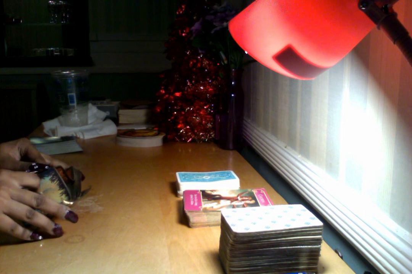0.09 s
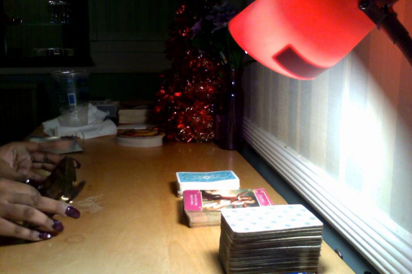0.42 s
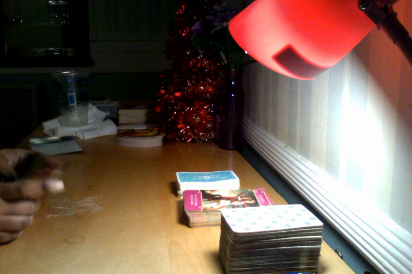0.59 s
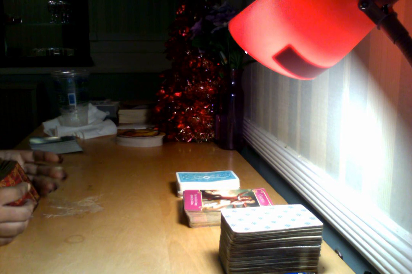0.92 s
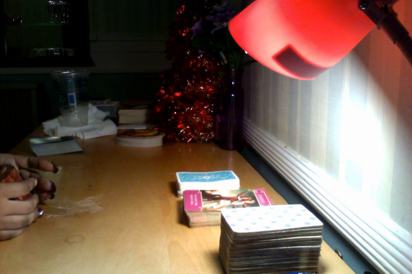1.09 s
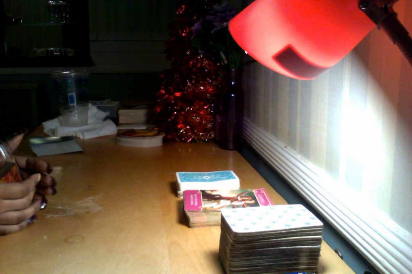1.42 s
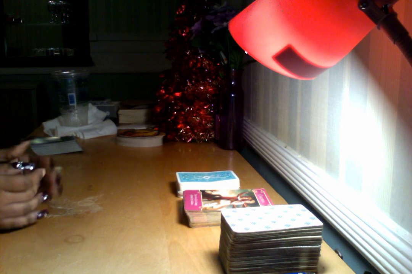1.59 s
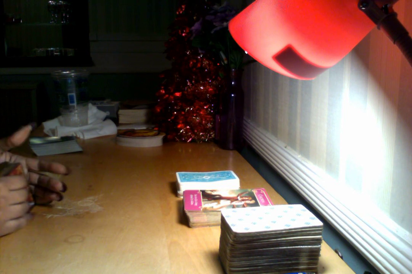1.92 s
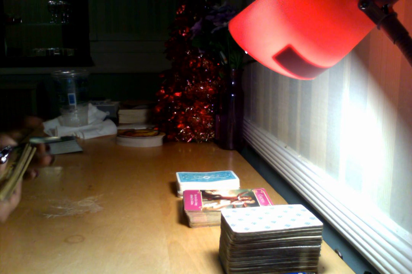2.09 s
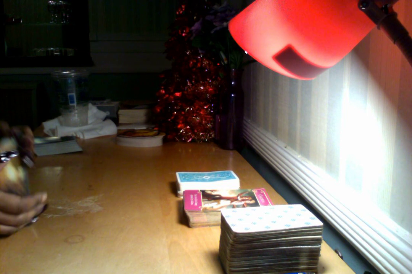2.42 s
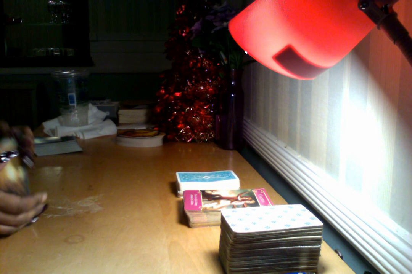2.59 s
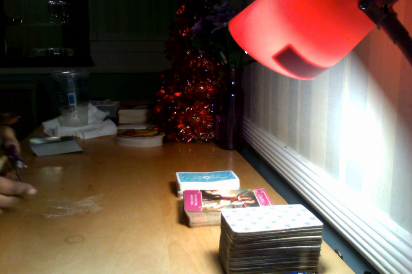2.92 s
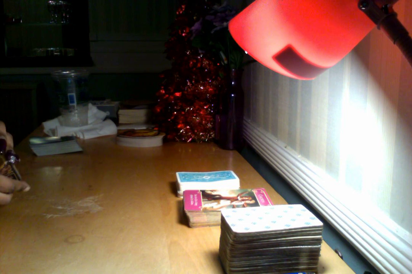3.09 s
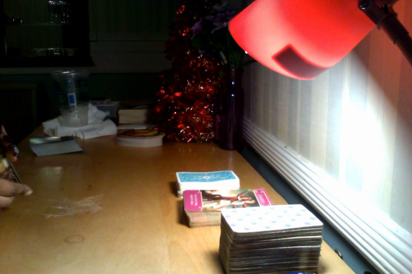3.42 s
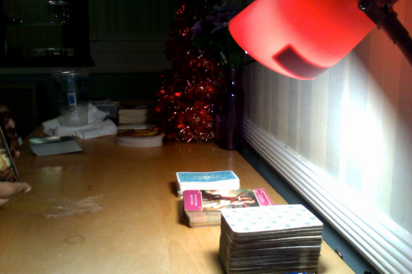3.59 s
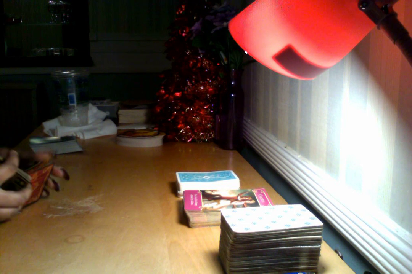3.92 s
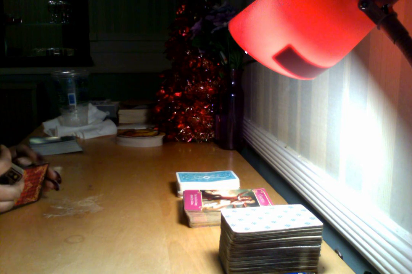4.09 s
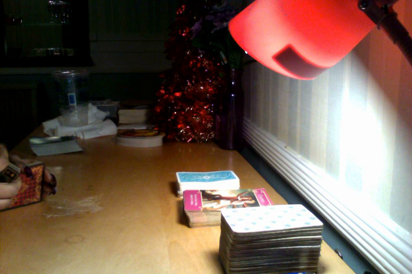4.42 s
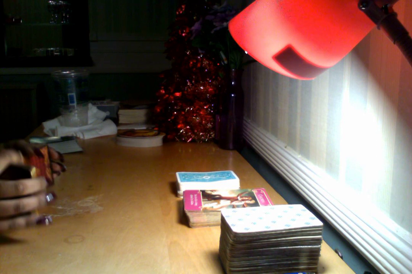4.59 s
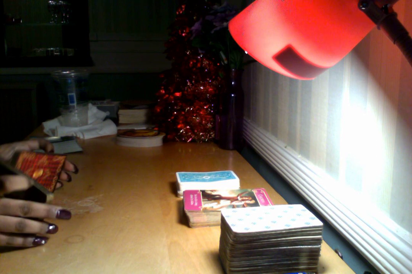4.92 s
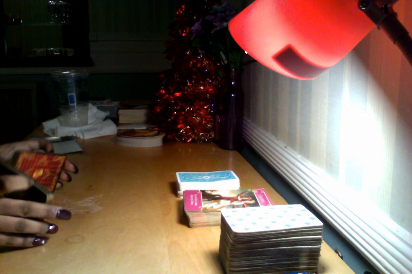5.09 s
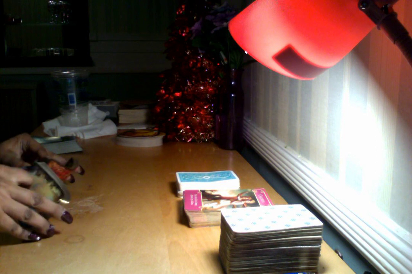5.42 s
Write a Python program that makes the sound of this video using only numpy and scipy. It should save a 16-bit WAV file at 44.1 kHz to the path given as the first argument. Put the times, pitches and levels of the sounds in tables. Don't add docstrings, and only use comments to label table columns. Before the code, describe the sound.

Close-up hands riffle and square playing cards on a wooden table, with sparse snaps, slaps, one heavy blow and quiet rustling in a lively room.

```python
import sys
import numpy as np
from scipy import signal
from scipy.fft import rfft, irfft
from scipy.io import wavfile
from scipy.ndimage import uniform_filter1d

SR = 44100
rng = np.random.default_rng(int(sys.argv[2]) if len(sys.argv) > 2 else 0)


def generate_wav(sig):
    pcm = np.round(np.clip(np.atleast_2d(sig).T, -1, 1) * 32767).astype(np.int16)
    wavfile.write(sys.argv[1], SR, pcm)


def elevation(decibels):
    levels = np.asarray(decibels, float)
    return 10 ** (levels / 20)


N = 243431


def evened(x):
    return x / np.sqrt(np.mean(x ** 2) + 1e-30)


def read(points, hz):
    f, value = np.transpose(points)
    return np.interp(np.log(hz + 1), np.log(f + 1), value)


def add(mix, s, sound):
    part = mix[max(round(s * SR), 0):][:len(sound)]
    part += sound[:len(part)]


def colour(x, points):
    hz = abs(np.fft.fftfreq(2048, 1 / SR))
    log_gain = np.log(elevation(np.maximum(read(points, hz), -90)))
    taps = np.fft.ifft(np.exp(np.conj(signal.hilbert(log_gain)))).real[:1024]
    return signal.oaconvolve(x, taps / np.linalg.norm(taps))


def band(x, low_hz, high_hz):
    sos = signal.butter(3, [low_hz, min(high_hz, 16000)], "bandpass", fs=SR, output="sos")
    return signal.sosfilt(sos, x)


def resonate(x, hz, width_hz):
    r = np.exp(-np.pi * width_hz / SR)
    return 2 * signal.lfilter([1 - r], [1, -r * np.exp(2j * np.pi * hz / SR)], x).real


def burst(length_s, rise_s, rough_db, grain):
    t = np.arange(0, length_s, 1 / SR)
    noise, lumps = rng.standard_normal((2, SR // 2))
    grainy = noise * elevation(rough_db * evened(uniform_filter1d(lumps, size=grain)))
    shape = np.minimum(t / rise_s, 1) * np.minimum((length_s - t) / (.3 * length_s), 1)
    return grainy[:len(t)] * shape


# f/Hz, t60/s
ROOM_DECAY = [(120, 0.56), (330, 0.44), (870, 0.48), (1700, 0.48), (3500, 0.49), (5000, 0.45), (7000, 0.34),
              (10000, 0.26), (13000, 0.18)]


def room(x, onset_s=0.0009):
    evenness = .7
    hz, t, z = signal.stft(rng.standard_normal(SR), SR, nperseg=256)
    z = z / (abs(z) + 1e-9) ** evenness
    t60 = np.clip(read(ROOM_DECAY, hz), .05, 2)[:, None]
    tail = signal.istft(z * elevation(-60 * t / t60), SR, nperseg=256)[1]
    tail *= 1 - np.exp(-np.arange(len(tail)) / SR / onset_s)
    return signal.fftconvolve(x, tail / np.linalg.norm(tail))[:N]


# t/s, peak level/dB, pitch f/Hz, treble level/dB
RIFFLE = [(0.0034, -19.5, 1600, -8), (0.0955, -22.5, 1670, -10), (0.1033, -14, 1830, -16.5),
          (0.1155, -10.5, 1260, -12.5), (0.124, -15.5, 2170, -13), (0.203, -34, 1410, -4.5),
          (0.2102, -5.5, 1940, -12), (0.217, -13, 3200, -8.5), (0.228, -13, 1485, -24.5),
          (0.234, -19, 3077, -11.5), (0.2796, -29, 1518, -17), (0.2915, -17.5, 1290, -16),
          (0.2996, -14.5, 3120, -14), (0.3069, -23.5, 1397, -21), (0.3149, -14.5, 1420, -13.5),
          (0.3205, -0.5, 1570, -14.5), (0.3276, -11, 2170, -2), (0.343, -22.5, 2635, -10.5),
          (0.3618, -12.5, 1400, -6.5), (0.3724, -16, 1850, -2.5), (0.394, -15.5, 1170, -11),
          (0.402, -20.5, 1680, -9.5), (0.4317, -8, 1790, -36)]
# t/s, peak level/dB, pitch f/Hz, treble level/dB, treble f/Hz
CATCHES = [(0.6897, -38, 1280, -11, 5300), (0.8129, -38.5, 1224, -26, 5570),
           (1.3105, -51.5, 5000, -21, 5050), (1.3541, -49, 1820, -24, 7140), (1.592, -42, 2200, -13, 7000),
           (1.601, -39, 2200, -5, 7000), (1.7711, -30, 1178, -27, 4500), (1.8907, -28, 1070, -23, 5200),
           (1.9388, -22, 2600, -21, 5500), (1.9475, -27.5, 2500, -6.5, 5600), (1.9701, -40, 2530, 2, 6350),
           (2.3582, -54, 1060, -13, 5000), (2.4915, -37, 1078, -38, 5016), (3.79, -33, 2095, -29, 9000),
           (3.8082, -30, 2600, -14, 8500), (3.8169, -30.5, 1347, -7.5, 8700),
           (3.92, -27.5, 1160, -26, 6200), (4.0269, -40.5, 2590, -24, 5020),
           (4.1285, -44.5, 1300, -30, 5000), (4.334, -50, 1472, -26, 5406),
           (4.9652, -37.5, 1168, -27.5, 5010), (5.0294, -47.5, 988, -25.5, 5100),
           (5.123, -59.5, 4100, -15.5, 5100)]
# ring t60/s, share of broad fizz [ratio], fizz spread [ratio]
RIFFLE_EDGE = (0.016, .45, 1.9)
CATCH_EDGE = (.018, 0.15, 1.3)


def snaps():
    out, t = np.zeros(N), np.arange(2500) / SR
    riffle = [row + (6830,) for row in RIFFLE]
    for rows, (t60, broad, spread) in (riffle, RIFFLE_EDGE), (CATCHES, CATCH_EDGE):
        fade = elevation(-60 * t / t60) * (1 - np.exp(-t / .0005)) ** 2
        for s, db, hz, treble_db, treble_hz in rows:
            low, high = rng.standard_normal((2, len(t)))
            width_hz = 0.79 * hz
            rough = evened(resonate(resonate(low, hz, width_hz), hz, width_hz))
            body = 0.46 * np.sin(2 * np.pi * hz * t) + .5 * rough
            narrow_fizz = band(high, treble_hz / spread, treble_hz * spread)
            fizz = evened(narrow_fizz + broad * band(high, 3000, 13000))
            add(out, s - .001, elevation(db) * fade * (body + elevation(treble_db) * fizz))
    return out + elevation(-10) * room(out)


# f/Hz, width/Hz, level/dB
TABLE = [(207.8, 6.7, -8.5), (361, 30, -13.5), (510, 18, 6.5), (674, 12, -10.5), (772, 42, 2.5)]


def slap(contact_s, top_hz, wood_db, chatter_db, points):
    chatter_gap_s, chatter_t60_s = .009, 0.0093
    blow = np.pad(burst(contact_s, .0015, 2.5, grain=60), (0, SR // 4))
    body = band(colour(blow, points)[:len(blow)], 100, top_hz)
    body = band(band(body, 49, 0.98 * top_hz), 40, 1.15 * top_hz)
    knock = band(blow, 100, 830)
    wood = sum(elevation(db) * resonate(knock, hz, width) for hz, width, db in TABLE)
    since_click = np.arange(len(blow)) / SR % chatter_gap_s
    edges = blow * elevation(-60 * since_click / chatter_t60_s)
    chatter = band(band(edges, 10100, 11300), 10100, 11300)
    return body + elevation(wood_db + 11.5) * wood + elevation(chatter_db + 13) * chatter


# t/s, level/dB, contact t/s, top f/Hz, chatter level/dB
SLAPS = [(1.395, -32, 0.016, 3470, -60), (1.412, -35.5, 0.039, 5120, -50.5),
         (1.427, -27.5, 0.025, 6950, -30), (1.447, -24, 0.019, 6970, -14), (1.496, -30.5, 0.012, 7000, -48),
         (1.59, -39, 0.038, 7400, -35), (1.70, -46, 0.059, 2250, -33), (4.602, -24.5, 0.023, 4870, -26.5),
         (4.627, -22, 0.018, 8060, -25.5), (4.667, -23, 0.029, 8000, -17.5), (4.688, -21, 0.005, 8860, -46)]
SLAMS = [
    (2.561, -8, .016, 11050, -45.5),
]
# f/Hz, level per Hz/dB
SLAP_COLOUR = [(88, -32), (150, -15), (427, -14), (495, -8.5), (935, -8.5), (1380, -6), (1490, -13),
               (1940, -8.5), (2760, -11), (4570, -15.5), (10600, -33.5), (13000, -72)]
SLAM_COLOUR = [(88, -41), (150, -14.5), (207, -3.5), (290, -15), (390, -5.5), (782, -18), (1150, -10),
               (1380, -14.5), (1550, -5), (2350, -17), (3100, -12), (4000, -15), (4700, -20), (7070, -22.5),
               (14000, -64.5)]


def slaps():
    out = np.zeros(N)
    for rows, points, wood_db in (SLAPS, SLAP_COLOUR, -4.5), (SLAMS, SLAM_COLOUR, -6.5):
        for s, db, contact_s, top_hz, chatter_db in rows:
            add(out, s, elevation(db) * slap(contact_s, top_hz, wood_db, chatter_db, points))
    return out + elevation(-1.5) * room(out)


# t/s, peak level/dB, ring t60/s, second mode level/dB
THUMPS = [(0.009, -37.5, 0.08, -5.5), (0.11, -54, 0.059, -27), (0.238, -36, 0.11, -20),
          (0.352, -35.5, 0.16, -6.5), (0.456, -37, 0.11, -31), (1.466, -30.5, 0.1, -21),
          (1.605, -35, 0.1, -8), (1.732, -33.5, 0.071, -5.5), (1.919, -57, 0.09, -15),
          (2.467, -38, 0.096, -10.5), (2.579, -10, 0.07, -11.5), (3.938, -36, 0.074, -12.5),
          (4.038, -49, 0.094, -18), (4.089, -52.5, 0.14, -16), (4.149, -49, 0.071, -12),
          (4.632, -23.5, 0.14, -28), (4.688, -23, 0.095, -11)]
LOWEST_MODE_HZ = 121.8


def thumps():
    out, t = np.zeros(N), np.arange(SR // 2) / SR
    for s, db, t60, upper_db in THUMPS:
        swell = (1 - np.exp(-t / 0.021)) ** 2 * elevation(-60 * t / max(t60, .03))
        ring = np.sin(2 * np.pi * LOWEST_MODE_HZ * t)
        ring += elevation(upper_db) * np.sin(2 * np.pi * TABLE[0][0] * t)
        ring += elevation(-13 - 60 * t / .08) * np.sin(2 * np.pi * 500 * t)
        add(out, s - .008, elevation(db) * swell / swell.max() * ring)
    return out + elevation(-13.0) * room(out)


# fullest t/s, fizz level/dB, rise t/s, slide t/s, body over fizz level/dB
SLIDES = [(0.01, -30.5, 0.09, 0.0035, -7), (0.115, -31, 0.012, .004, -9.5), (0.212, -38, 0.01, 0.063, -3.5),
          (0.326, -24.5, 0.037, 0.095, -7), (0.429, -40, 0.026, 0.017, -1.5),
          (0.562, -56, 0.12, 0.14, -3.5), (1.0, -66, 0.6, .04, -3), (1.181, -68.5, .12, .03, -6.5),
          (1.31, -73, 0.0058, .05, -3.5), (1.92, -71, 0.33, .02, 4), (1.942, -54.5, 0.015, .004, 0.5),
          (2.038, -53, .012, .004, -16), (2.2, -79, 0.23, 0.15, -3), (2.356, -67, 0.0059, .01, -11.5),
          (3.726, -66, 0.12, .01, -9.5), (3.81, -53, 0.011, 0.024, -8), (3.879, -69.5, 0.072, 0.12, 5.5),
          (4.022, -65, 0.2, .1, -7), (4.3, -82.5, .3, .06, 6), (4.93, -77.5, .04, 0.031, 2.5),
          (4.958, -74, 0.0099, 0.055, -6), (5.036, -68, .01, 0.036, -10), (5.19, -80, 0.22, 0.15, 7)]
# f/Hz, level per Hz/dB
RUSTLE_COLOUR = [(88, -43.5), (150, -14), (264, -9), (524, 0), (998, -5), (1120, -2), (1530, -5.5),
                 (1760, -2), (3420, -5), (10400, -22), (16000, -37.5)]


def rustle():
    rise_db, sag_db_per_s, fall_db_per_s, body_lag_db_per_s = 14, 102.5, 339.5, 152
    t, fizz_power, body_power = np.arange(N) / SR, 0, 0
    for s, db, rise_s, slide_s, body_db in SLIDES:
        before, after = np.maximum(s - t, 0), np.maximum(t - s, 0)
        ended = np.maximum(after - slide_s, 0)
        shape_db = db - rise_db * before / abs(rise_s)
        shape_db = shape_db - sag_db_per_s * np.minimum(after, slide_s) - fall_db_per_s * ended
        fizz_power = fizz_power + elevation(2 * shape_db)
        body_power = body_power + elevation(2 * (shape_db + body_db + body_lag_db_per_s * ended))
    noise, lumps = rng.standard_normal((2, N))
    grainy = noise * elevation(2.6 * evened(uniform_filter1d(lumps, size=150)))
    slips = colour(grainy, RUSTLE_COLOUR)[:N]
    fizz = signal.sosfilt(signal.butter(2, 4000, "highpass", fs=SR, output="sos"), slips)
    body = slips - fizz
    return (np.sqrt(fizz_power) * fizz + np.sqrt(body_power) * body) / fizz.std()


# t/s, level/dB
TICK = (2.037, -29.5)
# f/Hz, level/dB, t60/s
TICK_MODES = [(1880, -4, 0.21), (5000, -8, 0.1), (4830, 2, 0.21), (5370, -6.5, 0.03), (5450, -22, 0.13),
              (6530, -9, 0.52), (8570, -11, 0.095), (8700, -11, 0.18), (10270, -7, 0.093),
              (11500, -6.5, 0.09)]
# delay t/s, level/dB
TICK_BOUNCES = [
    (0, 1.5),
    (0.008, -5.5),
    (.019, -13.5),
]


def tick():
    out, t = np.zeros(N), np.arange(0, .25, 1 / SR)
    s, level_db = TICK
    ring = sum(elevation(db - 60 * t / np.clip(t60, .012, .022)) * np.sin(2 * np.pi * hz * t)
               for hz, db, t60 in TICK_MODES)
    click = elevation(3) * band(np.exp(-t / .0001), 2200, 13000)
    knuckle = elevation(level_db - 3.5 - 60 * t / 0.018) * np.sin(2 * np.pi * 1480 * t)
    add(out, s, knuckle)
    onset = 1 - np.exp(-t / 0.00046)
    for delay, db in TICK_BOUNCES:
        add(out, s + delay, elevation(level_db + db) * (ring + click * (delay == 0)) * onset)
    return out + elevation(-16) * room(out)


# hardest t/s, level/dB, lead-in t/s, let-go t/s
RUBS = [(0.01, -51, .02, .12), (0.113, -38.5, 0.045, 0.068), (0.326, -41, 0.15, 0.18),
        (0.762, -54.5, 0.63, 0.4), (1.38, -75, 0.53, 0.04), (1.928, -53.5, 0.097, .2),
        (2.13, -61.5, 0.23, 0.93), (2.49, -65, 0.11, .03), (3.66, -68, 0.15, 0.52),
        (3.95, -51.5, .05, 0.097), (4.022, -59, .6, 0.61), (4.958, -55, .04, 0.2), (5.12, -64.5, 0.51, 1)]


def wrists():
    slope_db = 25.5
    t, drag = np.arange(N) / SR, rng.standard_normal(N)
    power = 0
    for s, db, lead_s, leave_s in RUBS:
        distance = np.maximum((s - t) / abs(lead_s), (t - s) / abs(leave_s))
        power = power + elevation(2 * (db - slope_db * distance))
    modes = resonate(drag, LOWEST_MODE_HZ, 51) + 0.65 * resonate(drag, 410, 230)
    return np.sqrt(power) * evened(modes)


# t/s, level/dB, length t/s
DRAGS = [
    (0.798, -56, 0.12),
    (1.754, -55.5, 0.34),
    (2.148, -54.5, 0.18),
    (3.431, -46.5, .19),
    (3.823, -46, 0.23),
    (5.145, -47, 0.18),
]
# f/Hz, level per Hz/dB
DRAG_COLOUR = [(180, -54), (300, -17.5), (366, -5.5), (441, -26.5), (466, -15), (530, -7.5), (638, -10.5),
               (872, -1.5), (1210, -3.5), (1440, -10.5), (2680, -10), (3320, -32.5), (4290, -27),
               (9000, -46.5), (11700, -80), (19800, -120)]


def drags():
    out, sag_db = np.zeros(N), -6.5
    for s, db, length_s in DRAGS:
        stroke = burst(length_s, .03, 2, grain=250)
        stroke = stroke * elevation(db + sag_db * np.linspace(0, 1, len(stroke)))
        add(out, s, colour(stroke, DRAG_COLOUR))
    return 1.02 * out + 0.52 * room(out)


# f/Hz, level per Hz/dB
AIR_COLOUR = [(24, -61), (40, -35.5), (54, -15.5), (196, -11.5), (233, -3.5), (324, -19.5), (358, -3),
              (438, -18.5), (485, -11.5), (550, -18.5), (1230, -22), (3920, -35.5), (4340, -28),
              (5870, -38), (16500, -46)]
# f/Hz, level/dB
HUM = [(120, -77), (240, -76.5), (360, -82.5), (480, -78.5)]
# f/Hz, width/Hz, level/dB
WHINE = [(4180, 20, -85), (4710, 30, -89), (5240, 40, -92)]


def air():
    t = np.arange(N) / SR
    hiss = irfft(rfft(rng.standard_normal(N)) * elevation(read(AIR_COLOUR, np.fft.rfftfreq(N, 1 / SR))), N)
    hum = sum(elevation(db + 0.5) * np.sin(2 * np.pi * (hz * t + rng.random())) for hz, db in HUM)
    whine = sum(elevation(db) * evened(resonate(rng.standard_normal(N), hz, width)) for hz, width, db in WHINE)
    return elevation(-66.5) * evened(hiss) + hum + whine


def scene():
    hands = snaps() + tick() + slaps() + thumps() + rustle() + wrists()
    return (hands + drags() + air())[None]


def band_limit(x):
    return signal.sosfilt(signal.butter(12, 16840, fs=SR, output="sos"), x)


def record(dry):
    ceiling, edge_hz = .73, 16300
    x = signal.sosfilt(signal.butter(3, 80, "highpass", fs=SR, output="sos"), dry)
    x = signal.sosfilt(signal.butter(4, 14500, fs=SR, output="sos"), x)
    x = np.clip(x, -ceiling, ceiling)
    x = signal.sosfilt(signal.cheby2(12, 70, 1.04 * edge_hz, fs=SR, output="sos"), x)
    return band_limit(x)


dry = scene()
out = record(dry)
generate_wav(out)
```